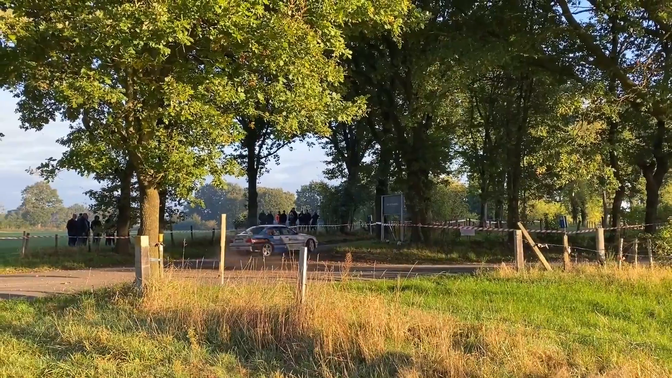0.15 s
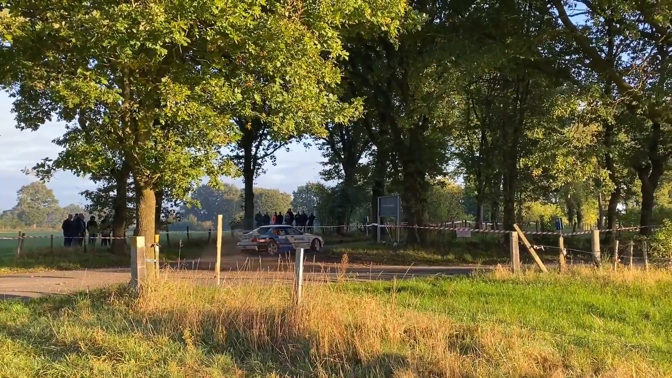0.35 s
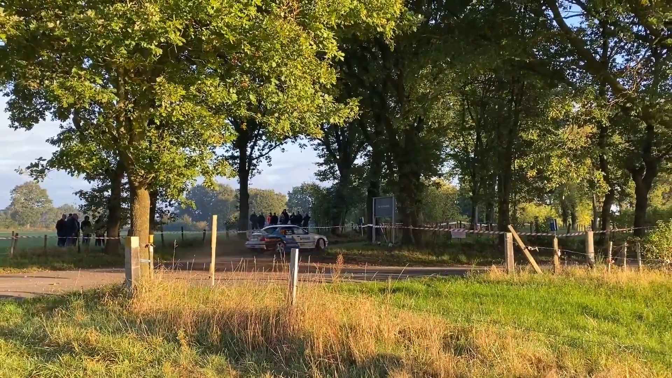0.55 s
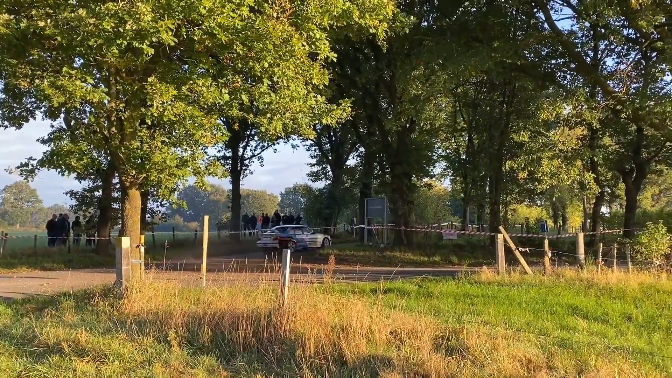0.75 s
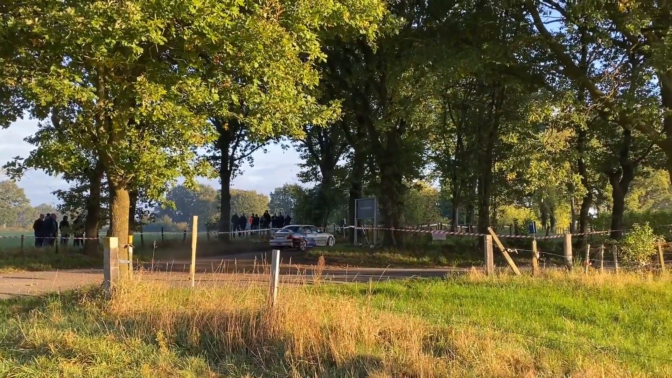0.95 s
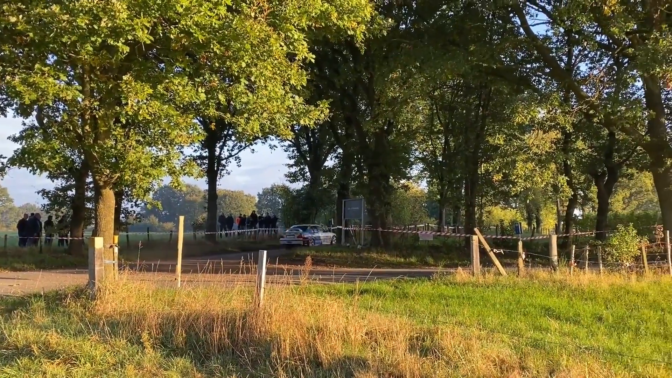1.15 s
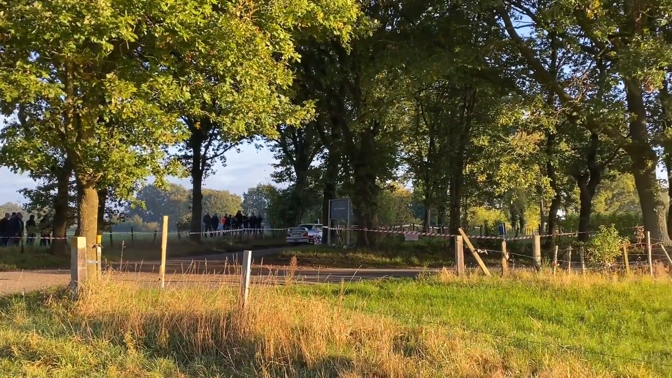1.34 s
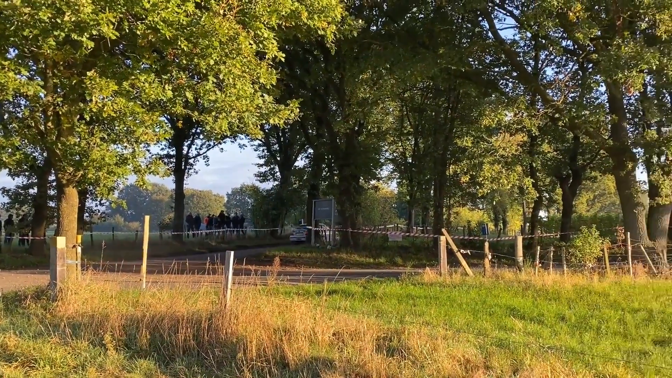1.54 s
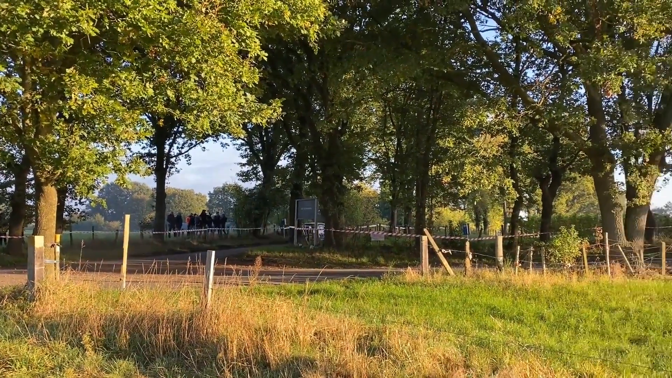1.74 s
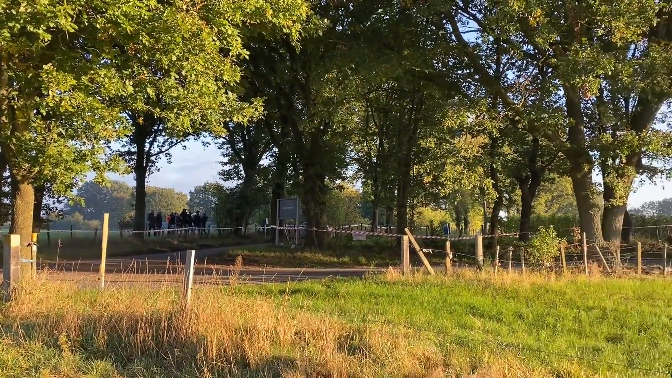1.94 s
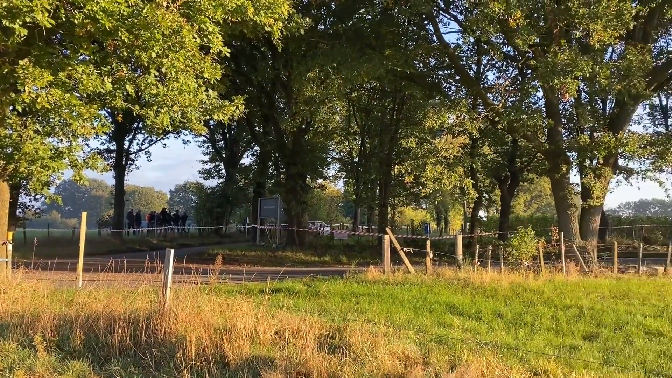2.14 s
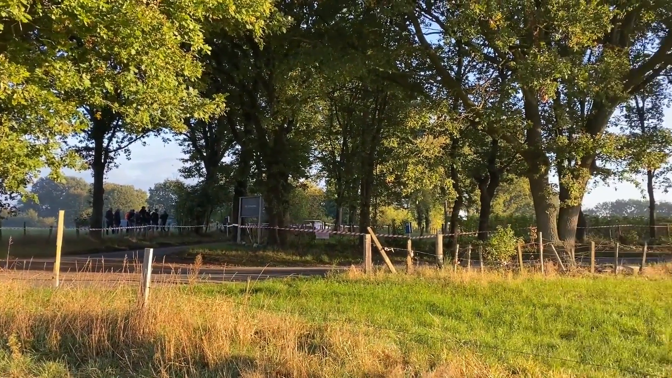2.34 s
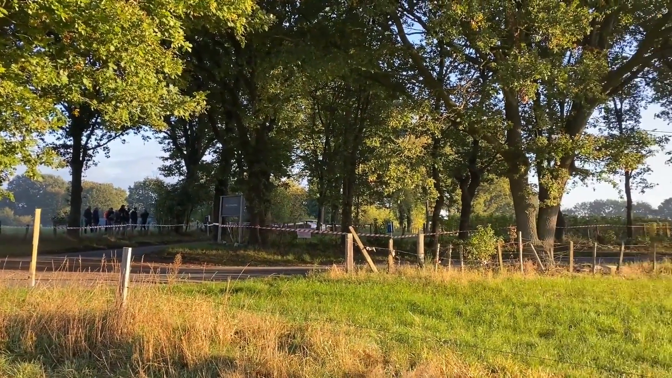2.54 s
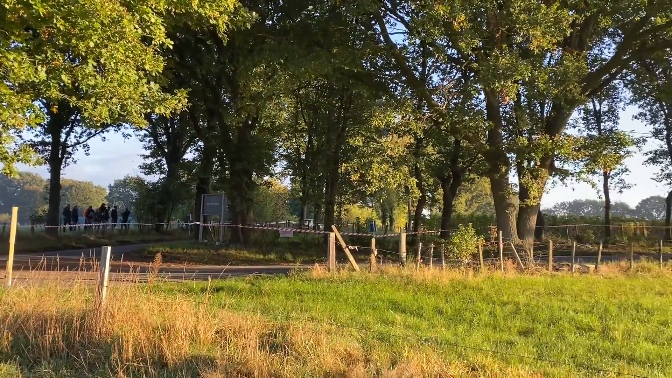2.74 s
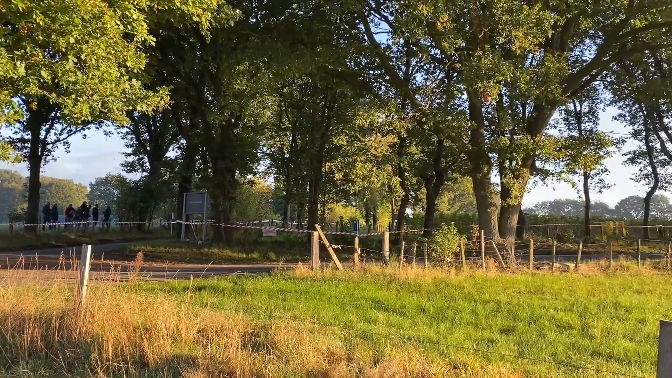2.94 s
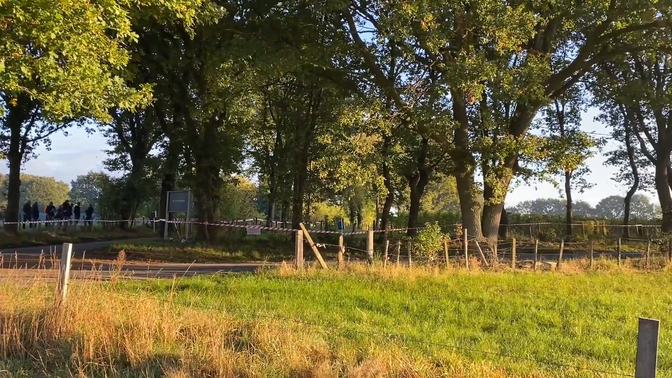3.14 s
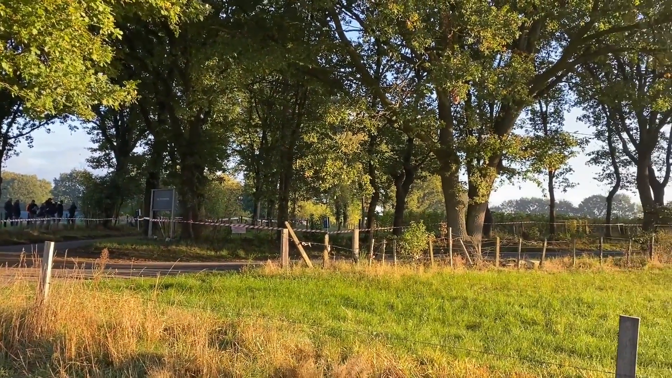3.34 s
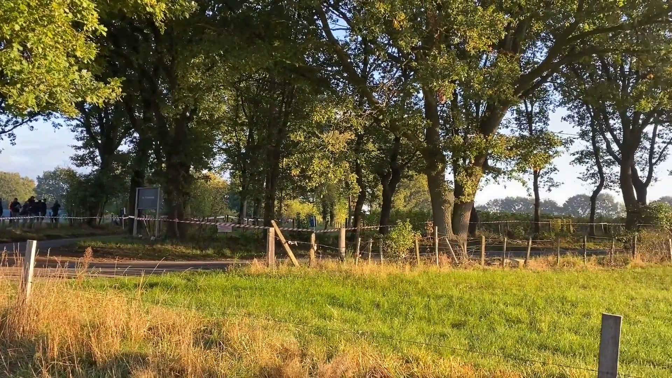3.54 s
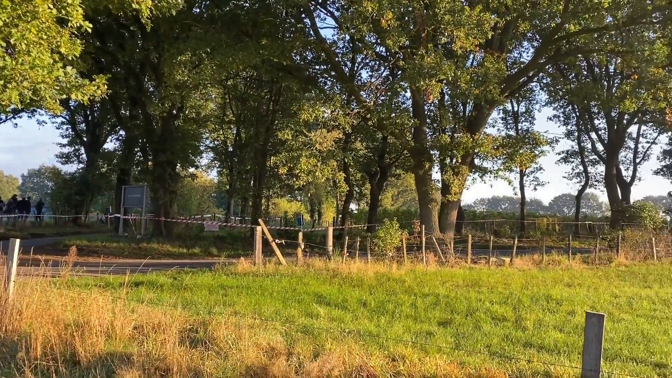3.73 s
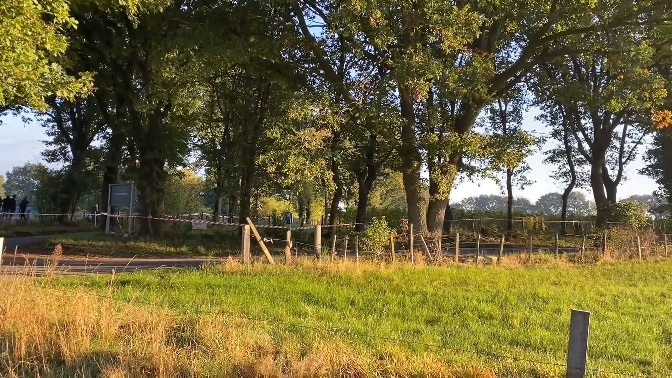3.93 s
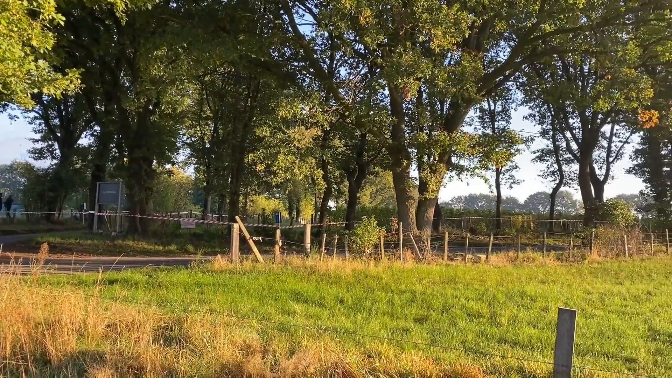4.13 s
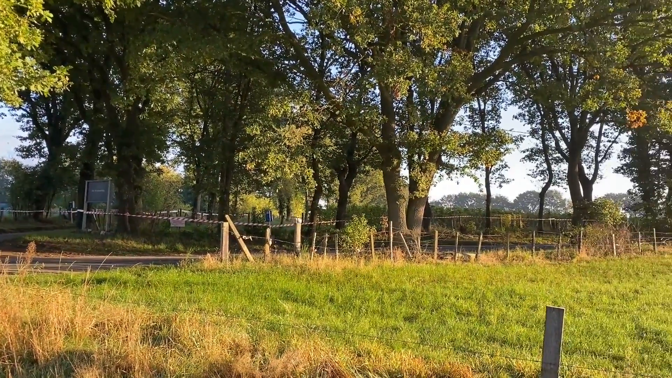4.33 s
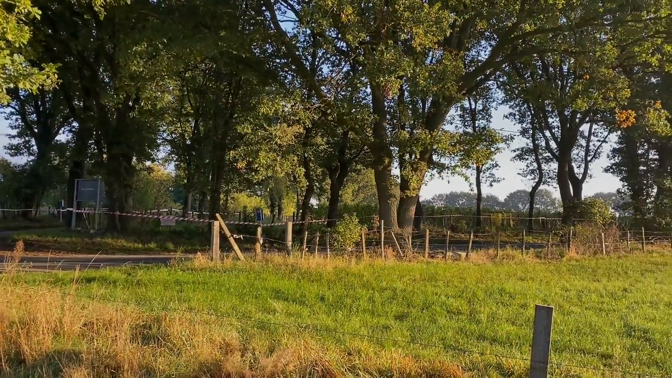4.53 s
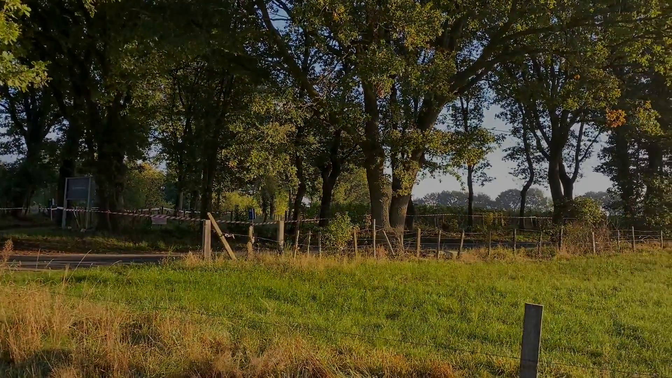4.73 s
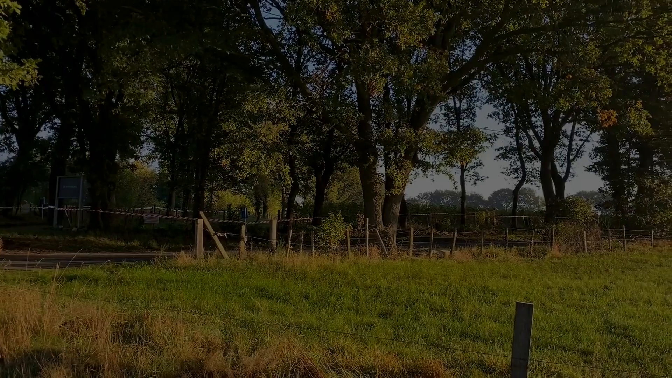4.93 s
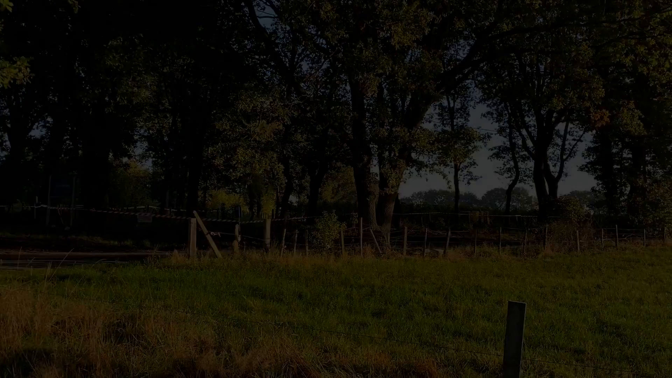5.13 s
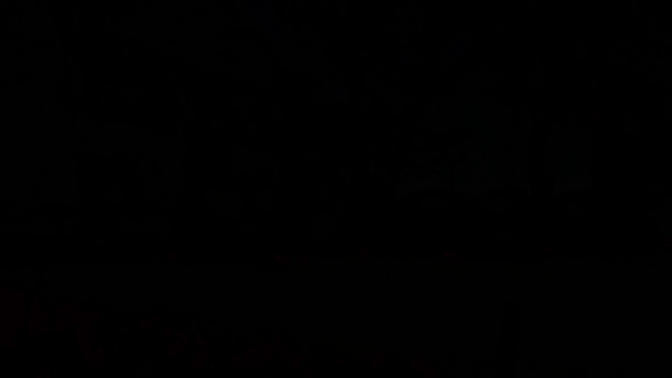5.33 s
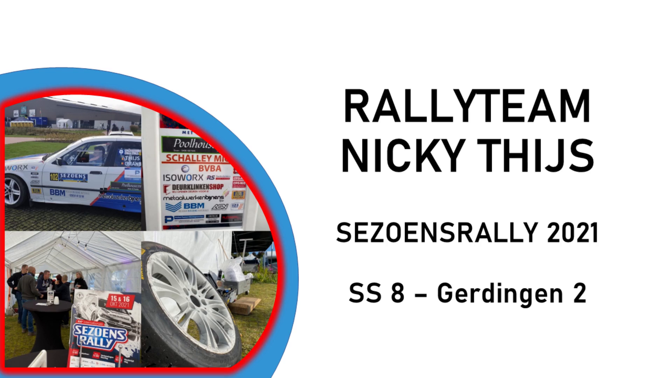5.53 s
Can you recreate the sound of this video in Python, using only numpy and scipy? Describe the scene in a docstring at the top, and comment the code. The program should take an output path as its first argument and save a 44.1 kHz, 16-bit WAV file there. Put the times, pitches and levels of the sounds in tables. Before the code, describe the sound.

A rally car slides through a bend with brief tyre squeals, then accelerates away through two upshifts, its exhaust rasping.

```python
"""A four-cylinder rally car slides through a bend and speeds away along a tree-lined road.
Its exhaust sounds orders of the crank speed, coloured by pipe and silencer, over a rasping gas jet.
In the bend the revs sag while the tyres scrub and squeal. The revs then climb through two upshifts,
each with thuds in the exhaust. A thin, high sizzle flutters on top.
Trunks scatter a thin echo; the sound fades out."""
import sys
import numpy as np
from scipy import signal
from scipy.fft import rfft, irfft, next_fast_len
from scipy.io import wavfile

SR = 44100
rng = np.random.default_rng(int(sys.argv[2]) if len(sys.argv) > 2 else 0)


def put_to_file(sound):
    """Save the sound as 16-bit audio at rate SR, in the file named by the first command-line argument."""
    columns = np.atleast_2d(sound).T  # one column per channel
    safe = np.clip(columns, -1, 1)
    whole_steps = np.round(safe * 32767)
    wavfile.write(sys.argv[1], SR, whole_steps.astype(np.int16))


N = 250047
TIME = np.arange(N) / SR

# Crank speed up to the first shift: time_s, speed_rps
CRANK_SPEED = [(0, 107), (.04, 103.6), (.2, 101.4), (.47, 106.9), (.69, 106.9), (.89, 104.1), (1.03, 96.5),
               (1.15, 95.3), (1.28, 89.3), (1.45, 89.7), (1.62, 98.1), (1.74, 101.5), (1.87, 107.4),
               (2.03, 111.4), (2.21, 119.5), (2.5, 129.7), (2.73, 137.6), (2.91, 142.7)]
# Upshifts: shut_s, open_s, full_s, flare_rps, clutch_grip_s, grip_rps, next_second_gain_rps
UPSHIFTS = [(2.907, 3.094, 3.122, 141.5, 3.31, 122.2, 23.6), (4.137, 4.283, 4.34, 145, 4.51, 120.5, 18)]
# Unevenness of the firings: time_s, weight
UNEVENNESS = [(0, 1), (1.2, .5), (1.6, .5), (2.3, 1.2), (3.6, 1.6), (4, 2.6), (4.45, 3), (4.8, 1.8)]

# Crank orders under power, relative: time_s, level_db
BOOM_DB = [(0, -16), (.04, -14), (.12, -21.5), (.19, -15), (.25, -17.5), (.36, -24.5), (.56, -15),
           (.68, -20), (.8, -17), (.9, -19.5), (1.12, -14), (1.56, -15.5), (1.73, -22.5), (2.06, -21.5),
           (2.12, -28), (2.23, -24), (2.5, -24.5), (2.85, -32.5), (3.25, -29.5), (3.62, -26.5), (3.69, -31),
           (3.78, -27.5), (4, -27), (4.06, -34.5), (4.37, -30), (4.83, -32.5)]  # order 2, the firing tone
GROWL_DB = [(0, -31.5), (.27, -22.5), (.31, -27), (.47, -23.5), (.53, -29.5), (1.04, -21.5), (1.12, -24.5),
            (1.33, -22.5), (1.46, -28), (1.65, -25), (2.15, -26.5), (2.29, -34), (2.34, -29.5), (2.5, -33),
            (2.58, -22.5), (2.64, -24.5), (2.74, -48), (2.82, -27.5), (3.44, -28), (3.77, -38), (4.48, -34),
            (4.57, -44), (4.64, -32), (5.2, -35.5)]  # order 4
THROB_DB = [(0, -40), (.25, -34.5), (.85, -37.5), (1.1, -29), (1.3, -22.5), (1.5, -28.5), (1.85, -38.5),
            (2.4, -39.5), (2.55, -50), (2.68, -33.5), (2.9, -34), (3.22, -42.5), (3.35, -36), (3.46, -46),
            (3.83, -37), (4.05, -43.5), (4.38, -35), (4.6, -39.5), (5.2, -42)]  # orders 1 and 3
SNARL_DB = [(0, -29.5), (.3, -32), (.65, -32), (1, -31.5), (1.45, -29.5), (1.8, -28.5), (2.1, -31),
            (2.45, -37), (2.62, -27), (2.75, -25.5), (2.88, -37.5), (3.22, -31), (3.7, -30.5), (3.9, -39),
            (4.05, -40), (4.4, -39), (4.62, -39), (5.2, -43.5)]  # order 5
BRAY_DB = [(0, -25), (.3, -25.5), (.42, -27.5), (.7, -24.5), (1, -25.5), (1.35, -22), (1.6, -18),
           (1.85, -26), (2.1, -27), (2.3, -36), (2.55, -32), (2.7, -41.5), (2.88, -29), (3.2, -40.5),
           (3.45, -35), (3.6, -41), (3.87, -33), (4.05, -40), (4.48, -35), (4.62, -42)]  # order 6
BLARE_DB = [(0, -22), (.29, -21.5), (.37, -24.5), (.92, -23), (1.22, -15), (1.49, -17), (1.75, -24.5),
            (2.19, -38.5), (2.43, -28), (2.5, -35.5), (2.85, -40), (3.2, -40.5), (3.37, -34), (3.75, -39.5),
            (3.82, -35.5), (3.89, -48.5), (4.46, -40), (4.62, -42.5), (5.2, -45)]  # orders 7-22
NASAL_DB = [(0, -52.5), (.8, -48.5), (1.03, -42), (1.35, -40.5), (1.65, -41.5), (2.02, -44.5),
            (2.25, -55.5), (4.6, -61)]  # orders 13-22 in the silencer
# Tailpipe response: freq_hz, gain_db
PIPE_RESPONSE = [(90, -9), (105, -14.5), (130, -20.5), (265, 5), (320, -15.5), (390, -8.5), (450, -4.5),
                 (520, -1), (630, 1), (800, 3), (900, -1.5), (1000, -3.5), (1120, -15), (1500, -27.5),
                 (1800, -22), (2100, -28), (3200, -29.5)]
# Silencer resonances: centre_hz, width_hz, gain_db
SILENCER_MODES = [(1350, 170, -2.5), (1840, 200, 2)]

# Gas jet and tyre noise under power, relative: time_s, rasp_db, scrub_db
RASP_SCRUB_DB = [(0, -43.5, -35), (.57, -40, -31.5), (.85, -43.5, -35), (1.05, -41, -33.5),
                 (1.4, -41.5, -39), (1.9, -43.5, -44), (2.55, -40, -41.5), (2.9, -36, -43),
                 (3.27, -44, -45.5), (3.52, -41, -48.5), (3.88, -41, -49.5), (4.04, -39, -46.5),
                 (4.48, -45.5, -48)]
# Buzzing edge, relative to the rasp: time_s, level_db
EDGE_DB = [(0, -11), (1.3, -13), (2.7, -7.5), (3.4, -4.5), (3.95, -2), (4.5, -5)]
# Road rumble and high sizzle, relative: time_s, level_db
RUMBLE_DB = [(0, -42), (.33, -47.5), (.65, -55), (1.1, -50.5), (2.1, -49), (2.8, -54), (4.5, -56.5)]
SIZZLE_DB = [(0, -52), (.6, -50), (1.5, -55), (2.4, -57.5), (2.8, -53), (3.3, -63), (4.1, -62), (4.6, -84)]
# Noise spectra: freq_hz, gain_db
JET_SPECTRUM = [(25, -26), (60, -13), (200, -5.5), (330, -6.5), (600, 10), (850, 4.5), (1100, -0.5),
                (1500, 1.5), (2500, 1), (3600, -0.5), (5000, -5), (6200, -10), (8300, -14), (15500, -58)]
TYRE_SPECTRUM = [(25, -34.5), (60, -18), (170, -1.5), (330, 2.5), (750, 5.5), (1200, 6), (1520, -2.5),
                 (1820, 1.5), (2120, -3.5), (2350, -2), (2750, -12.5), (5000, -17), (8000, -18),
                 (15500, -37.5)]
RUMBLE_SPECTRUM = [(15, -44), (35, -22), (60, -4), (90, -1), (140, -3.5), (220, -1), (400, -13),
                   (1500, -66.5)]
SIZZLE_SPECTRUM = [(5500, -28), (7000, -1.5), (8700, -5), (9700, 5.5), (10800, -6), (14000, -5.5),
                   (15800, -10.5)]  # narrow peak near 9.7 kHz
# Left-right likeness of the noise: freq_hz, correlation
STEREO_CORRELATION = [(100, 1), (500, 0.6), (1000, 0.86), (2000, 0.5), (4000, .45), (10000, .35)]
# Tyre chirps: peak_s, length_s, relative_db, pitch_hz, sag_hz_per_s
TYRE_CHIRPS = [(0.057, .022, -25.5, 1391, 3002.5), (0.081, .024, -27, 1301, 3499),
               (0.108, 0.026, -28, 1137, 502), (.455, .08, -28, 1170, 500.5),
               (.564, 0.025, -20, 1260, 1501.5), (0.611, 0.028, -20.5, 1240, 0.5),
               (0.671, .026, -20, 1177, 1000), (0.703, 0.027, -19, 1180, -700),
               (.745, .018, -26, 1210, -0.5), (1.017, .06, -33, 1287, 1.5)]

# Sound arriving by way of the trunks: time_s, weight
TRUNK_SCATTER = [(0, 0.32), (.9, 0.24), (1.15, 0.14), (1.6, 0.14), (1.9, 0.36), (2.4, 0.7), (5.4, 0.65)]
# Echo decay: freq_hz, t60_s
ECHO_DECAY = [(150, 0.45), (700, 0.9), (3000, 0.73), (10000, 0.11)]
# Echo colour: freq_hz, gain_db
ECHO_SPECTRUM = [(150, -10.5), (300, 6.5), (600, 2), (1200, 7), (5000, 3.5)]
# Exhaust thuds in the shifts: start_s, level_db, pitch_hz, t60_s
SHIFT_THUDS = [(2.922, -32, 165, 0.27), (3.076, -26, 240, 0.033), (3.1, -22.5, 85, 0.056),
               (4.162, -30.5, 92, 0.12), (4.19, -34.5, 168.3, 0.66), (4.287, -26, 153, 0.046),
               (4.451, -22, 720, 0.03)]

HONK_S, HONK_LENGTH_S = 1.5, .8  # full load at the bend's exit
CUT_S, TRAIL_S = .034, .14  # off-throttle fall of noise body and hiss
JET_BAND_HZ = (3000, 8000)  # reference band for the jet's level


def amp(db):
    return 10 ** (np.asarray(db) / 20)


def unit_rms(x):
    return x / np.sqrt(np.mean(x ** 2) + 1e-20)


def curves(rows):
    """Each value column, interpolated over TIME."""
    time_s, *columns = np.transpose(rows)
    return [np.interp(TIME, time_s, column) for column in columns]


def at_freq(rows, hz):
    """Table lookup on a log-frequency axis."""
    freq_hz, value = np.transpose(rows)
    return np.interp(np.log(hz + 1), np.log(freq_hz), value)


def swell(peak_s, length_s):
    """Gaussian bump of height 1."""
    return np.exp(-(2 * (TIME - peak_s) / length_s) ** 2)


def wander(rate_hz):
    """Smooth random drift, rms 1."""
    step = SR / (8 * rate_hz)
    knots = np.convolve(rng.standard_normal(2 ** 15), np.hanning(9), "valid")
    return unit_rms(np.interp(np.arange(N) / step, np.arange(len(knots)), knots))


def lowpass(x, hz):
    return signal.sosfiltfilt(signal.butter(2, hz, fs=SR, output="sos"), x)


def bandpass(x, band_hz, order=2):
    return signal.sosfilt(signal.butter(order, band_hz, "band", fs=SR, output="sos"), x)


def noise(spectrum, band_hz):
    """Coloured stereo noise; its mid channel has rms 1 inside band_hz."""
    size = next_fast_len(N, True)
    hz = np.fft.rfftfreq(size, 1 / SR)
    mid, side = rfft(rng.standard_normal((2, size))) * amp(at_freq(spectrum, hz))
    correlation = np.clip(at_freq(STEREO_CORRELATION, hz), 0, 1)
    side = side * np.sqrt((1 - correlation) / (1 + correlation))
    band_rms = irfft(mid * (hz > band_hz[0]) * (hz < band_hz[1])).std()
    return irfft(np.array([mid + side, mid - side]))[:, :N] / band_rms


def crankshaft(jitter=.00549, coast_rps=133, coast_s=.08, flare_s=.04):
    """Crank speed and angle; in a shift it coasts, flares, is dragged down by the clutch and climbs."""
    rps, = curves(CRANK_SPEED)
    for shut_s, open_s, full_s, flare_rps, grip_s, grip_rps, gain_rps in UPSHIFTS:
        free = np.interp(TIME, [shut_s, shut_s + coast_s, open_s - flare_s, full_s],
                         [np.interp(shut_s, TIME, rps), coast_rps, coast_rps, flare_rps])
        slip = (flare_rps - grip_rps) * np.clip((grip_s - TIME) / (grip_s - full_s), 0, 1) ** 1.2
        climb = gain_rps * np.maximum(TIME - grip_s, 0) ** .75  # each gear pulls hardest at first
        rps = np.select([TIME < shut_s, TIME < full_s], [rps, free], grip_rps + slip + climb)
    uneven = 1 + jitter * curves(UNEVENNESS)[0] * wander(45)
    return rps, np.cumsum(rps * uneven) / SR


def throttle_lift(fall_s, lag_s=0, snap=1):
    """0 under power, up to 1 in a shift; back to 0 lag_s after full throttle."""
    lift = np.zeros(N)
    for shut_s, open_s, full_s, *_ in UPSHIFTS:
        dying = np.clip((TIME - shut_s) / fall_s, 0, 1)
        waiting = np.clip((full_s + lag_s - TIME) / (full_s + lag_s - open_s), 0, 1)
        lift += dying * waiting ** snap
    return lift


def engine_db(fall_s=.019, bark_db=4):
    """Order levels; all collapse in a shift. Boom and growl return first, the growl with a bark."""
    early, late = throttle_lift(fall_s, snap=3.1), throttle_lift(fall_s, lag_s=.05)
    bark = bark_db * sum(swell(full_s + .021, .046) for _, _, full_s, *_ in UPSHIFTS)
    boom = curves(BOOM_DB)[0] - 9 * early
    growl = curves(GROWL_DB)[0] - 22 * early + bark
    throb, snarl, bray = (curves(rows)[0] - 20 * late for rows in (THROB_DB, SNARL_DB, BRAY_DB))
    blare = curves(BLARE_DB)[0] - 25 * late
    return boom, growl, throb, snarl, bray, blare


def multipath(hz, scatter, trunk_hz=560):
    """Complex gain of direct plus scattered sound: tones swell and cancel; long waves pass the trunks."""
    share = scatter * curves(TRUNK_SCATTER)[0] * np.minimum(hz / trunk_hz, 1) ** .48
    real, imag = (unit_rms(wander(6) + .37 * wander(32)) for _ in range(2))
    return (1 + share * (real + 1j * imag) / np.sqrt(2)) / np.sqrt(1 + share ** 2)


def order_wave(order, rps, turns, scatter, pipe_hz=265, damping=.29, stagger_rad=1.8):
    """One multiple of the crank speed leaving the pipe; above resonance it lags by half a cycle."""
    hz = order * rps
    ratio = hz / pipe_hz
    lag = np.arctan2(damping * ratio, 1 - ratio ** 2) + .0043 * order ** 2
    lag += stagger_rad * (order % 2)  # unequal header pipes
    # Shifting ground paths put the ears out of step.
    skew = .32 * np.minimum(hz / 680, 2) * wander(3.6) * np.array([[1], [-1]])
    gain = multipath(hz, scatter)
    phase = 2 * np.pi * (order * turns % 1) - lag + skew + np.angle(gain)
    return -np.sqrt(2) * abs(gain) * np.cos(phase.astype(np.float32))


def tailpipe(orders, rps, turns, scatter, even_db=-3, honk_db=13.5, honk_hz=650, width_hz=490):
    """Orders coloured by the pipe, whose resonance honks under full load; rms about 1."""
    peak_db = honk_db * swell(HONK_S, HONK_LENGTH_S)
    gains = []
    for k in orders:
        resonance_db = peak_db * np.exp(-(2 * (k * rps - honk_hz) / width_hz) ** 2)
        gains.append(amp(at_freq(PIPE_RESPONSE, k * rps) + even_db * (k % 2 == 0) + resonance_db))
    waves = sum(gain * order_wave(k, rps, turns, scatter) for k, gain in zip(orders, gains))
    return waves / np.linalg.norm(gains, axis=0)


def exhaust(rps, turns, half_order_db=-14):
    """Two firings a turn give the main tones; other orders surround them, half orders under full load."""
    boom, growl, throb, snarl, bray, blare = engine_db()
    tones = amp(boom) * order_wave(2, rps, turns, scatter=.45)
    tones += amp(growl) * order_wave(4, rps, turns, scatter=.45)
    others = amp(snarl) * order_wave(5, rps, turns, scatter=.82)
    others += amp(bray) * order_wave(6, rps, turns, scatter=.82)
    others += amp(throb) * tailpipe((1, 3), rps, turns, scatter=.82)
    others += amp(blare) * tailpipe(range(7, 23), rps, turns, scatter=1)
    half_gain = amp(blare + half_order_db) * swell(HONK_S, HONK_LENGTH_S)
    others += half_gain * tailpipe((5.5, 7.5), rps, turns, scatter=1)
    roughness = wander(91) * curves(UNEVENNESS)[0]
    lope = 1 + .044 * np.cos(np.pi * turns)  # four strokes take two turns
    return tones * (1 + .046 * roughness) + others * (lope + .09 * roughness)


def nasal_ring(rps, turns, scatter=3.4):
    """High orders ring in turn as the revs carry them through the silencer's resonances."""
    ring = 0
    for k in range(13, 23):
        gain = sum(amp(db) / (1 + (2 * (k * rps - hz) / width_hz) ** 2)
                   for hz, width_hz, db in SILENCER_MODES)
        ring += gain * order_wave(k, rps, turns, scatter)
    return unit_rms(ring) * amp(curves(NASAL_DB)[0]) * (1 - throttle_lift(CUT_S))


def rasp_scrub_db(fall_s, drop_db=14):
    """Jet and tyre levels; off the throttle the gas slackens and the wheelspin stops."""
    return np.array(curves(RASP_SCRUB_DB)) - drop_db * throttle_lift(fall_s, lag_s=.038)


def gas_jet(turns, gain_db=-2, flutter_db=1.1, body_hz=2400):
    """Gas puffs from the pipe at each firing; off the throttle its body dies fast and its hiss trails."""
    rasp_db, _ = rasp_scrub_db(CUT_S)
    hiss_db, _ = rasp_scrub_db(TRAIL_S)
    puffs = 1 + .13 * np.cos(4 * np.pi * turns) + .058 * np.cos(2 * np.pi * turns)
    gas = noise(JET_SPECTRUM, JET_BAND_HZ) * unit_rms(puffs * amp(flutter_db * wander(70)))
    body = lowpass(gas, body_hz)
    return (body * amp(rasp_db) + (gas - body) * amp(hiss_db)) * amp(gain_db)


def silencer(turns, ring_hz=1850, width_hz=220, gain_db=-12):
    """Gas puffs ring a narrow resonance, more so when the engine blares."""
    rasp_db, _ = rasp_scrub_db(CUT_S)
    *_, blare_db = engine_db()
    puffs = (1 + .78 * np.cos(4 * np.pi * turns)) * noise(JET_SPECTRUM, JET_BAND_HZ)
    ring = signal.lfilter(*signal.iirpeak(ring_hz, ring_hz / width_hz, fs=SR), puffs)
    return unit_rms(ring) * amp(.75 * rasp_db + .25 * blare_db + gain_db)


def shock_buzz(turns, ring_hz=(1630, 2030), ring_db=-10, edge_hz=(2850, 4250), flutter_db=2):
    """The same ragged pair of shocks each turn buzzes in the silencer and gives the rasp its edge."""
    rasp_db, _ = rasp_scrub_db(CUT_S)
    turn = np.arange(256) / 256
    shocks = rng.standard_normal(len(turn)) * np.exp(-(2 * turn % 1) / .34)
    train = np.interp(turns % 1, turn, shocks)
    out = 0
    for band_hz, db in ((ring_hz, ring_db), (edge_hz, curves(EDGE_DB)[0])):
        ring = bandpass(train, band_hz) * amp(flutter_db * wander(14))
        out += amp(rasp_db + db) * unit_rms(ring)
    return out


def tyre_scrub(gain_db=-3.5, judder_db=1.6, body_hz=1900):
    """Rubber scrubs the dusty road in uneven grabs, under an even hiss."""
    _, scrub_db = rasp_scrub_db(CUT_S)
    rush = noise(TYRE_SPECTRUM, band_hz=(1550, 2250))
    body = lowpass(rush, body_hz)
    grabs = unit_rms(amp(judder_db * wander(50)))
    return (body * grabs + rush - body) * amp(scrub_db + gain_db)


def tyre_squeal(slide_hz=1243, grip_s=1, grip_db_per_s=89.5, gain_db=-4, judder_db=2, grit_db=-43):
    """Tread sticks and slips: chirps over a faint squeal until it grips. Grit grinds in mid-slide."""
    envelope = amp(-45 - grip_db_per_s * np.maximum(TIME - grip_s, 0))
    weighted_hz = envelope * slide_hz
    for peak_s, length_s, db, pitch_hz, sag_hz_per_s in TYRE_CHIRPS:
        chirp = amp(db) * swell(peak_s, length_s)
        envelope += chirp
        weighted_hz += chirp * (pitch_hz - sag_hz_per_s * (TIME - peak_s))
    hz = weighted_hz / envelope  # the strongest slip sets the pitch
    phase = 2 * np.pi * np.cumsum(hz * (1 + .02 * wander(120))) / SR
    tone = np.sin(phase) + amp(-10) * np.sin(2 * phase)
    grit = unit_rms(bandpass(rng.standard_normal(N), band_hz=(3200, 4700), order=3))
    squeal = unit_rms(tone * amp(judder_db * wander(90))) * envelope * amp(gain_db)
    return squeal + grit * amp(grit_db) * swell(peak_s=.56, length_s=.26)


def road_rumble(gain_db=-.5):
    """Low roar of the car on the road."""
    return noise(RUMBLE_SPECTRUM, band_hz=(30, 80)) * amp(curves(RUMBLE_DB)[0] + gain_db)


def high_sizzle(ticks_per_s=14000, spread_db=2, flutter_db=2.2, burst_db=7):
    """Thin, high sizzle of tiny ticks; it flutters unevenly, swells once and drops in the shifts."""
    ticks = rng.standard_normal((2, N)) * (rng.random(N) < ticks_per_s / SR)
    ticks *= amp(spread_db * np.minimum(rng.exponential(1, N), 3))
    size = next_fast_len(N, True)
    colour = amp(at_freq(SIZZLE_SPECTRUM, np.fft.rfftfreq(size, 1 / SR)))
    sizzle = irfft(rfft(ticks + ticks.mean(0), size) * colour)[:, :N]
    level_db = curves(SIZZLE_DB)[0] + flutter_db * wander(14) + burst_db * swell(2.81, .041)
    return unit_rms(sizzle) * amp(level_db) * (1 - throttle_lift(TRAIL_S))


def tree_echo(x, taps_per_s=1500, delay_s=.012, frame=256):
    """Trunks scatter sparse echoes, different for each ear; the treble dies first."""
    taps = rng.standard_normal((2, SR)) * (rng.random((2, SR)) < taps_per_s / SR)
    taps[:, :round(delay_s * SR)] = 0
    hz, age_s, bins = signal.stft(taps, SR, nperseg=frame)
    bins *= amp(-60 * age_s / at_freq(ECHO_DECAY, hz)[:, None])
    norm = np.linalg.norm(signal.istft(bins, SR, nperseg=frame)[1][0])
    bins *= amp(at_freq(ECHO_SPECTRUM, hz))[:, None]
    tail = signal.istft(bins, SR, nperseg=frame)[1] / norm
    return signal.fftconvolve(x, tail, axes=1)[:, :N]


def exhaust_thuds(puff_hz=450, rise_s=.00059):
    """As the throttle shuts and opens, slugs of gas ring the exhaust with a dull puff."""
    out = np.zeros(N)
    for start_s, level_db, pitch_hz, t60_s in SHIFT_THUDS:
        age_s = np.maximum(TIME - start_s, 0)
        ring = np.sin(2 * np.pi * pitch_hz * age_s) + .63 * wander(puff_hz)
        out += ring * amp(level_db - 60 * age_s / t60_s) * (1 - np.exp(-age_s / rise_s))
    return out


def pan_left(x, shadow_hz=420, pan_db=2):
    """The car is left of centre; only the upper range is shaded on the far side."""
    low = lowpass(x, shadow_hz)
    return low + (x - low) * amp(np.array([[pan_db], [-pan_db]]) / 2)


def scene(echo_db=-18):
    """Engine, tyres, their echo and the high sizzle."""
    rps, turns = crankshaft()
    engine = exhaust(rps, turns) + nasal_ring(rps, turns)
    rasp = gas_jet(turns) + silencer(turns) + shock_buzz(turns)
    car = engine + rasp + tyre_scrub() + tyre_squeal() + road_rumble() + exhaust_thuds()
    return pan_left(car + amp(echo_db) * tree_echo(car)) + high_sizzle()


def record(dry, ceiling=.84, fade_s=4.485, fade_db_per_s=60.5, mute_s=5.38, cutoff_hz=15850):
    """Soft clip, fade to silence, band limit."""
    rounded = dry / (1 + (dry / ceiling) ** 12) ** (1 / 12)
    fade = amp(-fade_db_per_s * np.maximum(TIME - fade_s, 0))
    fade *= np.interp(TIME, [mute_s, mute_s + .04], [1, 0])
    band_limit = signal.firwin(511, cutoff_hz, window=("kaiser", 9), fs=SR)
    return signal.oaconvolve(rounded * fade, band_limit[None], "same")


dry = scene()
out = record(dry)
put_to_file(out)
```